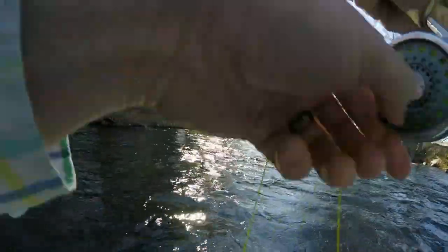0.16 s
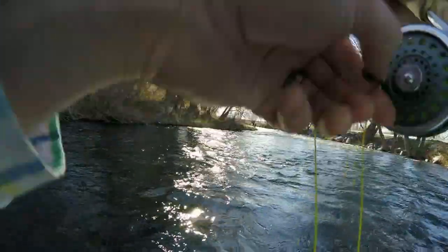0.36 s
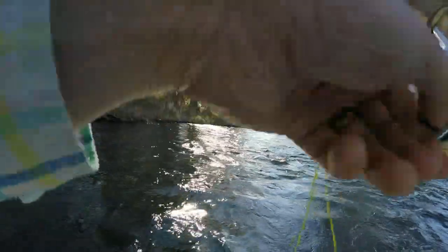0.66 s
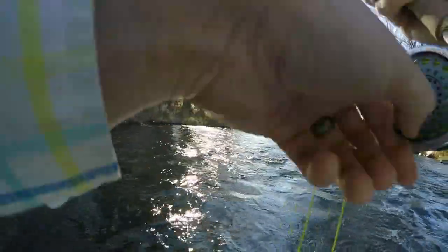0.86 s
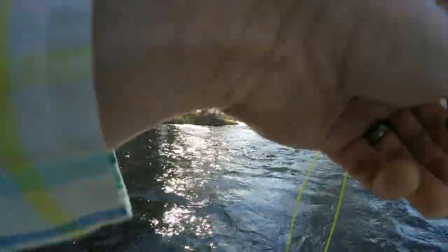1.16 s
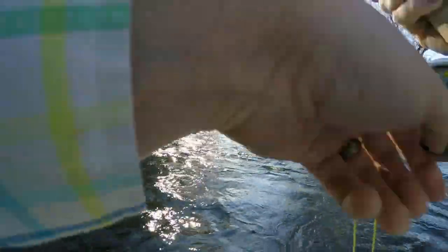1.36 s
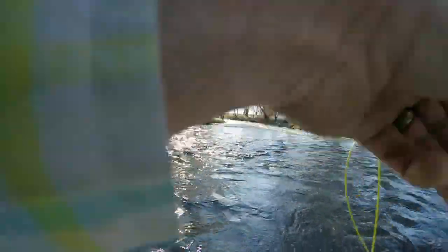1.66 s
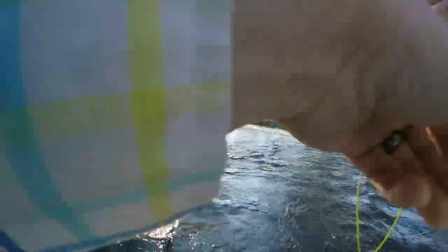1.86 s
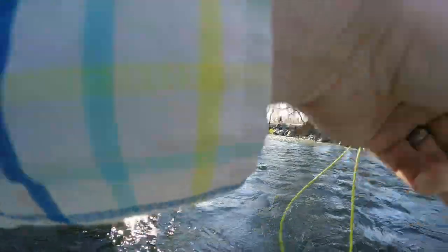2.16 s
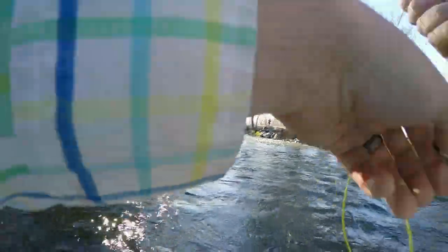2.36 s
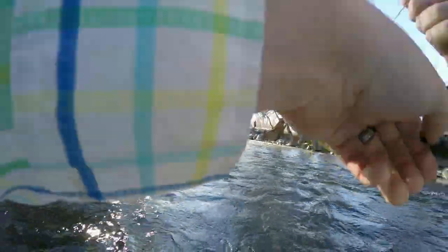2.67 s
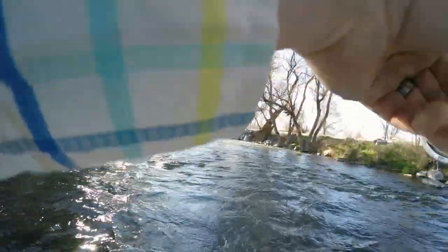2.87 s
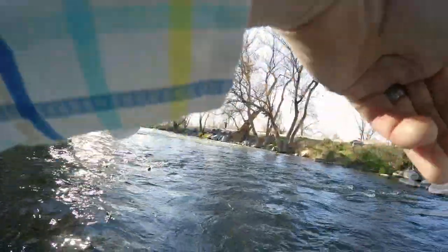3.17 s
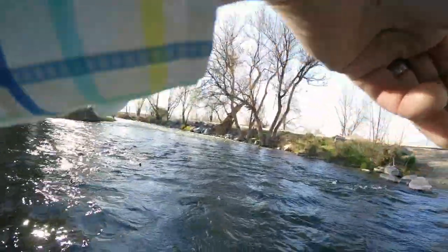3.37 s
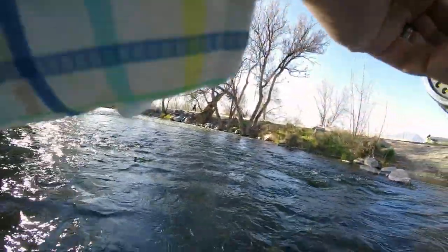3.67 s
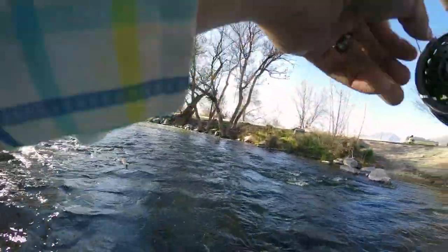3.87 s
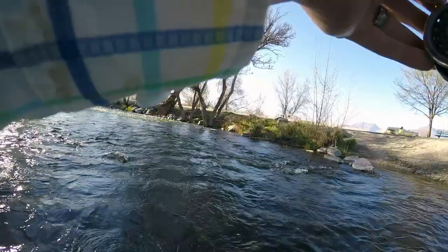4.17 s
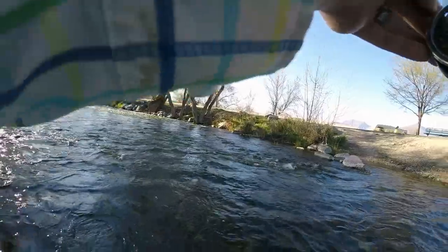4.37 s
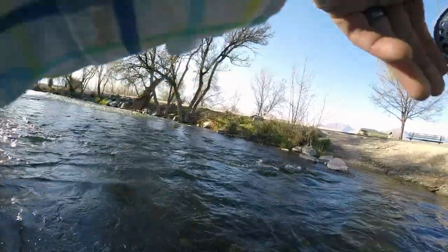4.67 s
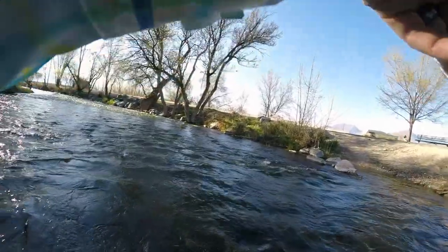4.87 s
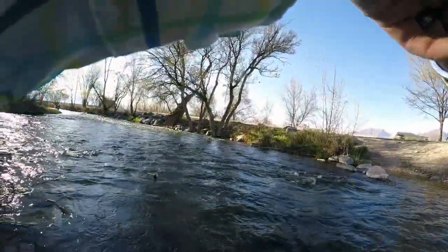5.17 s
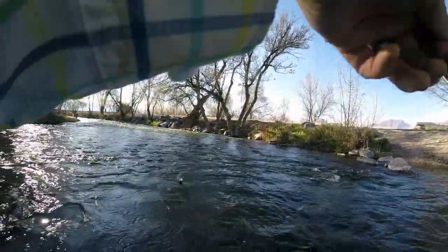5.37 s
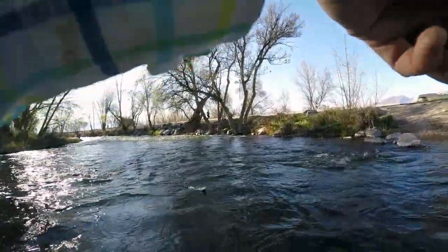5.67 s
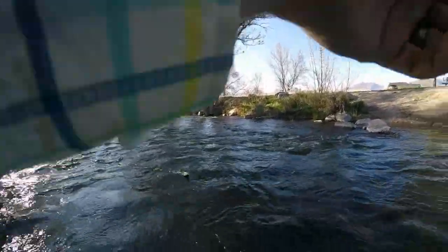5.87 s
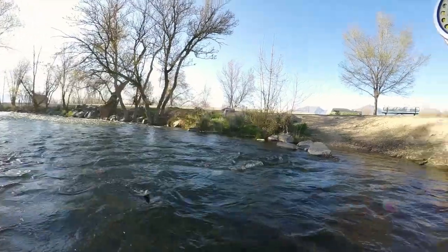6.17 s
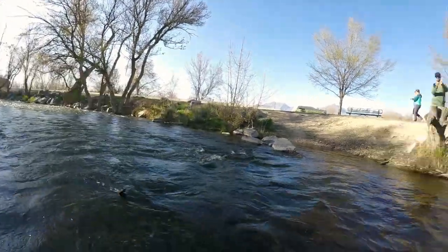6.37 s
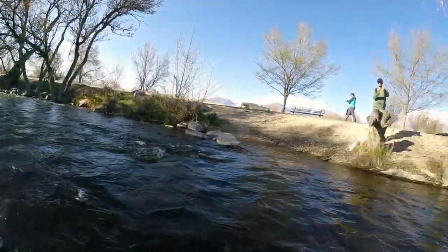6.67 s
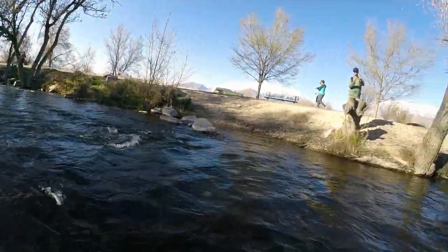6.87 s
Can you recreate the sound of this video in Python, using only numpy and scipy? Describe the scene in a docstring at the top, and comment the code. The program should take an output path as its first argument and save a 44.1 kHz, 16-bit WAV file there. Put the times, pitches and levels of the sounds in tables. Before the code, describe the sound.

Close by, a fishing reel's ratchet buzzes in fast metallic clicks, slows, then rattles out again over a gurgling river before wind gusts swamp the microphone.

```python
"""A fly reel is cranked close to a small camera, with a river gurgling and wind on the microphone throughout.
First come twelve quick turns: a spring pawl snaps over a 32-tooth gear and each snap rings the spool's modes.
Then come slow single clicks, a thin whistle, and a run of clicks as line is pulled back out; a gust ends it.
Snaps, bubbles and handle knocks are damped sines, and the whistle is a wavering sine.
The river wash, the wind and the rubbing of line and gear are shaped noise."""
import sys
import numpy as np
from scipy import signal
from scipy.io import wavfile
from scipy.ndimage import uniform_filter1d, map_coordinates

SR = 44100
rng = np.random.default_rng(int(sys.argv[2]) if len(sys.argv) > 2 else 0)


def transcribe(signal):
    """Save signal, clipped to [-1, 1], as a 16-bit WAV file at the path in sys.argv[1]."""
    frames = np.atleast_2d(signal).T
    limited = np.clip(frames, -1, 1)
    pcm = np.round(limited * 32767).astype(np.int16)
    wavfile.write(sys.argv[1], SR, pcm)


N = 309132  # length in samples, about 7 s

# quick turns of the handle, one row each: (start [s], quarter [s], half [s], three quarters [s],
# relative click level at the half turn [dB])
TURNS = [(.0041, 0.066, .1272, .1886, -20), (0.2377, 0.2977, .3634, .4212, -20),
         (0.4691, 0.5235, .5822, .6482, -19.5), (.6899, 0.742, .8139, .8759, -20),
         (0.9283, 0.9911, 1.064, 1.1248, -20), (1.1754, 1.2355, 1.3065, 1.374, -21),
         (1.4215, 1.477, 1.5451, 1.6081, -20.5), (1.655, 1.722, 1.7871, 1.8484, -20.5),
         (1.8988, 1.9548, 2.0287, 2.0971, -21.5), (2.1516, 2.2258, 2.3, 2.3728, -22),
         (2.4328, 2.5096, 2.5961, 2.6825, -22.5), (2.7466, 2.8397, 2.9218, 3.0042, -22)]
# the wrist labours at the same places: (share of each quarter's time spent on its first half [0 to 1])
FIRST_HALF = [.472, .536, .501, .517]
# single snaps, one tooth each: (time [s], relative level [dB])
SINGLE_SNAPS = [(3.0786, -22), (3.0878, -23), (3.0984, -24), (3.1124, -20), (3.1354, -19), (3.3808, -21),
                (3.4404, -21), (3.467, -19.5), (3.4886, -18.5), (3.517, -19), (3.5637, -19.5),
                (3.59, -20.5), (3.612, -21.5), (3.6694, -23), (3.7009, -20.5), (3.7334, -21), (3.7562, -28),
                (4.3406, -14), (5.2254, -19), (5.241, -17), (5.2565, -18), (5.2731, -18), (5.2937, -15.5),
                (5.3158, -16), (5.3356, -15), (5.3522, -15), (5.3652, -12.5), (5.3766, -16),
                (5.3871, -15.5), (5.3979, -16.5), (5.4089, -16.5), (5.4205, -17.5), (5.4335, -19.5),
                (5.4474, -24), (5.4625, -19.5), (5.4794, -17.5), (5.498, -19), (5.5183, -19), (5.547, -18),
                (5.5862, -18), (5.62, -19.5), (5.649, -19.5), (5.6787, -21.5), (5.707, -20.5),
                (5.7271, -21.5), (5.742, -20), (5.7542, -23), (5.7644, -23.5), (5.7751, -20), (5.7866, -20),
                (5.802, -19)]
# the pawl slips faintly without passing a tooth: (time [s], relative level [dB])
SLIPS = [(3.6935, -38), (3.708, -38), (3.797, -40), (4.328, -37), (4.572, -40), (5.536, -37), (5.693, -33)]
# ways the spool rings: (pitch [Hz], time to fall 60 dB before extra damping [s], pitch sway [%],
# tooth of highest pitch [tooth number], then eight relative levels towards the microphone,
# one for each eighth of the turn [dB])
SPOOL_MODES = [(1730, 0.0036, 1.2, 6.7, -14, -11.5, -14, -9.5, -8, -3, -8.5, -13),
               (2403, 0.0061, 0.33, 20, -7.5, -19, -41, -10, -4, -13, -7, -4.5),
               (2727, 0.0081, 3.4, 14.6, 4.5, 5, 0, 2, 0.5, 0, 2.5, 4),
               (3206, 0.0091, 1.1, 33, -2, -16, -3, -6.5, -6, -6, 2, 4),
               (3790, 0.0075, 4, 25.5, 4, -6, -7, -1, 2, -2, 3, 2.5),
               (4200, 0.011, 2, 28.6, 9, 1.5, -3, 1.5, 7, 9.5, 8, 0),
               (4630, 0.0038, 1, 2.8, 12, -3, -7.5, -15, -11, 1, -0.5, -3),
               (5460, 0.0041, 1.6, 39, 7, -3, -10, -2.5, 0.5, -3, -1, 2),
               (6325, 0.0045, 3.3, 12.8, 0, -0.5, -0.5, -3, 3, 3.5, 3, -1),
               (7330, 0.0072, 3, 11.8, 1, -2.5, -3, -3, -3, -4, 1, -3.5),
               (8140, 0.0051, 1.1, 15.6, -1.5, -7.5, -0.5, 2, -5, 2, 3.5, 8.5),
               (8840, 0.0055, 1.4, 18, 2.5, 3, 2.5, -0.5, -2.5, 3.5, 1.5, -1),
               (9690, 0.0051, 0.41, 10.5, 3, -18, -11, -3.5, -1.5, -2, -9, -3.5),
               (10690, 0.0063, 2.2, 3.3, -8, 4, -29, -6, -6, -2.5, 0, 0),
               (11200, 0.041, 0.3, 4, -14, -16, -12, -17, -13, -8, -8, -10),
               (11295, 0.012, 0.33, 3.9, 0, -2, -3, -1, -3.5, 6, 2.5, 0),
               (11870, 0.0021, 0.91, 43, 3.5, -5, -5, -1, -1, 3, 6, -6),
               (13230, 0.0051, 2, 13, -3, 1, -17, -15, -2.5, -12, 0, 0),
               (13700, 0.0042, 0.9, 21, -9, -7, -8, -7, -7, -5, -4, -8),
               (15000, 0.0048, 1, 16, -9, -8, -13, -16, -11, -13, -11, -8)]
# the handle knocks on its pin: (time [s], peak before echoes [dB])
KNOCKS = [(.1915, -15.5), (0.4168, -16.5), (.640, -16), (.8667, -17.5), (1.071, -17), (1.369, -20),
          (1.571, -17.5)]
# river colour: (frequency [Hz], relative level [dB per Hz])
RIVER_COLOUR = [(130, -48), (220, -14.5), (364, -1.5), (645, -1.5), (941, -1.5), (1170, -7.5), (1860, -10),
                (2070, -13), (3130, -13), (3880, -17), (4560, -19.5), (9180, -31), (11400, -33.5),
                (15200, -39), (16000, -61)]
# river flow: (time [s], relative level [dB], extra treble fizz in the wash [dB])
FLOW = [(0.0, -39, 9), (0.31, -40, 3.5), (1.67, -39.5, 3.5), (1.82, -39.5, 3), (3.18, -41, 2),
        (3.47, -37, -3), (3.94, -40, 3), (4.12, -38, 2.5), (5.39, -40, -1), (5.61, -31, -8.5),
        (5.82, -32, -3), (6.02, -36, 0.5), (6.25, -37, 1.5), (6.56, -33, 1), (6.66, -33.5, -1.5),
        (6.97, -50.5, 16)]
# single bubbles: (time [s], peak level [dB], starting pitch [Hz], time to fall 60 dB, at least 0.005 [s])
BUBBLES = [(0.71, -28.5, 877, 0.06), (0.816, -34, 385, 0.051), (1.496, -27, 497, 0.091),
           (1.827, -23, 426, 0.019), (2.251, -25, 740, 0.019), (2.48, -29.5, 725, 0.051),
           (3.205, -26, 1720, 0.009), (3.349, -31, 1410, 0.025), (3.431, -27, 2090, 0.016),
           (3.78, -24, 675, 0.016), (3.842, -35, 2040, 0.017), (4.01, -28, 405, 0.07),
           (4.03, -26, 335, 0.06), (4.07, -23, 338, 0.022), (4.307, -32, 2230, 0.023),
           (4.327, -27.5, 1000, 0.041), (4.348, -24.5, 540, 0.066), (4.392, -25, 513, 0.044),
           (4.56, -28, 380, 0.11), (4.64, -24.5, 2550, 0.0081), (4.787, -36, 1260, 0.04),
           (4.849, -28, 890, 0.036), (4.864, -27, 1780, 0.0065), (4.99, -16.5, 212, 0.1),
           (5.027, -31, 2410, 0.012), (5.179, -36, 1850, 0.02), (5.348, -24, 164, 0.061),
           (5.445, -19.5, 1327, 0.039), (5.485, -23, 332, 0.037), (5.511, -24, 684, 0.047),
           (5.594, -22, 804, 0.019), (5.652, -13, 730, 0.021), (5.687, -20, 600, 0.021),
           (5.812, -21.5, 627, 0.054), (5.853, -23.5, 1820, 0.025), (5.887, -27, 1980, 0.009),
           (5.946, -25, 900, 0.013), (5.997, -23, 1730, 0.0066), (6.093, -28, 3320, 0.012),
           (6.421, -23.5, 1880, 0.0091), (6.513, -20, 1900, 0.014), (6.488, -26, 1150, 0.02),
           (6.512, -24, 1210, 0.033), (6.552, -26, 1370, 0.025), (6.584, -26, 1110, 0.02),
           (6.597, -19, 3010, 0.0038), (6.763, -27, 3380, 0.0069), (6.809, -25, 557, 0.076)]
# breeze on the microphone, before random lumps: (time [s], rumble [dB], flutter [dB], roar [dB])
BREEZE = [(0, -32.5, -53, -48.5), (.75, -37, -48.5, -46), (1.2, -32, -60, -47), (1.5, -35.5, -51, -44),
          (2.3, -29.5, -56, -46.5), (3.0, -28, -48, -45.5), (3.3, -33.5, -50, -45.5),
          (3.9, -24.5, -41, -40.5), (4.3, -19, -37.5, -42.5), (4.5, -25, -37.5, -41),
          (5.0, -23, -33.5, -38.5), (5.4, -27, -49, -38.5), (6.03, -26, -46, -42.5), (6.25, -16, -19, -39),
          (6.56, -12, -19.5, -31.5), (6.8, -14, -18.5, -30.5), (6.92, -25, -14.5, -25.5),
          (7.0, -5.5, -11.5, -19.5)]
# single buffets of wind: (time [s], peak rumble [dB], peak flutter [dB])
BUFFETS = [(.06, -30, -38.5), (.53, -35, -42), (1.2, -26, -53), (1.335, -25, -45), (1.59, -27.5, -43),
           (2.51, -24, -39), (3.17, -23, -38), (3.37, -43, -38), (3.74, -37, -36), (4.17, -20, -25.5),
           (4.83, -26, -26), (4.99, -34, -25.5), (5.2, -22, -35), (5.35, -36, -31.5), (5.49, -15, -46),
           (5.63, -19, -49), (5.72, -24, -35), (5.89, -26, -29.5), (5.96, -19.5, -43), (6.12, -21, -43),
           (6.21, -24, -21), (6.32, -15, -25), (6.66, -12, -17), (6.76, -11, -14), (6.85, -21, -14.5)]

TEETH, LAST_TURN_ENDS_S = 32, 3.0703
PULL_S = 5.0  # from here line is pulled out and the gear runs backwards
# treble tilt of the snaps (dB per octave): first turn, last turn, slow winding, line pulled out, slips
TILT_FIRST_DB, TILT_LAST_DB, TILT_SLOW_DB, TILT_PULL_DB, TILT_SLIP_DB = 2, 0.1, -0.6, 0.8, -3
PULL_DAMPING_DB_PER_S = 2500  # the taut line and a palm on the spool shorten the ring
RING_HZ, RING_FADE_DB, RING_FADE_S = 4190, -5, 2.7  # the ring near this pitch weakens as the turns slow down
KNOCK_HZ = 3210
# rubbing at 100 teeth a second: level (dB) and centre (Hz), winding in and pulling out
RUB_IN_DB, RUB_IN_HZ, RUB_OUT_DB, RUB_OUT_HZ = -51, 6300, -34, 3900
# the level always rises with speed, the centre only while winding in
RUB_DB_PER_DOUBLING, RUB_IN_OCTAVES_PER_DOUBLING, RUB_SMOOTH_S = 8, 0.33, 0.03
WHISTLE_S, WHISTLE_LENGTH_S, WHISTLE_EDGE_S = 4.66, 0.25, 0.045
WHISTLE_DB, WHISTLE_HZ, WHISTLE_ARCH_HZ = -55, 4920, 120
BUFFET_S, BUFFET_ROAR_DB, LUMPS_DB = 0.023, -18, 2  # half width; roar relative to flutter; random lumps
HISS_DB, EDGE_HZ = -67, 16300  # level of a faint steady hiss; highest pitch kept


def reel():
    """Each snap rings all spool modes; the turning spool aims and tunes them differently from tooth to tooth."""
    s, db, tilt, tooth = clicks()
    hz, t60, sway, top_tooth, *aim_db = np.transpose(SPOOL_MODES)
    t = np.arange(900) / SR
    out = np.zeros((4, N))  # four sets of echoes, taken in turn

    # neighbouring snaps, and the same tooth a turn later, sound alike
    own = drifting(TEETH, 3 * len(hz), span=2)[np.round(tooth).astype(int) % TEETH]
    lately = drifting(len(s), 3 * len(hz), span=4)
    mixed = 0.44 * own + 0.76 * lately + 0.29 * rng.standard_normal(own.shape)
    phase, spread, detune = np.split(mixed, 3, axis=1)

    # loudness of each mode in each snap
    middles = np.arange(2, TEETH, 4)  # middle tooth of each eighth
    aimed_db = np.array([np.interp(tooth, middles, row, period=TEETH) for row in np.transpose(aim_db)]).T
    level_db = db[:, None] - 13.5 + aimed_db + tilt[:, None] * np.log2(hz / 6000)
    fade_db = RING_FADE_DB * np.minimum(s / RING_FADE_S, 1)
    level_db += fade_db[:, None] * (abs(hz / RING_HZ - 1) < 0.06)
    chance_db = 2.37 * spread * np.clip(hz / 7000, 0.45, 1.1)  # the low modes are the steadiest
    power = gain_of(2 * level_db)
    # chance moves energy between modes, adding none
    shared = (power * gain_of(2 * chance_db)).sum(1) / power.sum(1)
    level_db = level_db + chance_db - 10 * np.log10(shared)[:, None]
    level_db = level_db + 0.93 * spread[:, :1]  # whole snaps vary a little too

    # pitch of each mode in each snap: high, short-lived modes wander most
    f = hz * (1 + sway / 100 * np.cos(2 * np.pi * (tooth[:, None] - top_tooth) / TEETH))
    f += detune * 0.017 * hz * (0.0066 / t60) * np.clip(hz / 8000, 0.2, 1) ** 0.86

    rise_s = 0.00018 + 1.15 / hz[:, None]  # low modes take longer to swing in
    shape = (1 - np.exp(-t / rise_s)) ** 2 * gain_of(-60 * t / t60[:, None])
    shape = shape / np.sqrt((shape ** 2).sum(1, keepdims=True) / 380)  # equal energy whatever the decay
    for k in range(len(s)):
        start_phase = (1.25 + hz / 7000) * phase[k]
        waves = np.sin(2 * np.pi * f[k][:, None] * t + start_phase[:, None])
        ring = gain_of(level_db[k]) @ (shape * waves)
        damping = gain_of(-PULL_DAMPING_DB_PER_S * t * (s[k] > PULL_S))
        add(out[k % len(out)], s[k] - 0.0003, damping * ring)
    add_knocks(out[0])
    return out.sum(0) + gain_of(-19.0) * sum(near_echoes(part) for part in out)


def clicks():
    """The snaps, then the slips on whichever tooth the pawl rests."""
    s, db, tilt, tooth = snaps()
    slip_s, slip_db = np.transpose(SLIPS)
    slip_tilt = np.full(len(slip_s), TILT_SLIP_DB)
    slip_tooth = tooth[np.searchsorted(s, slip_s) - 1]
    return np.r_[s, slip_s], np.r_[db, slip_db], np.r_[tilt, slip_tilt], np.r_[tooth, slip_tooth]


def snaps():
    """Moment, level, tilt and tooth of each snap: the gear's turning sets when the pawl drops off a tooth."""
    *marks, turn_db = np.transpose(TURNS)
    quarters = np.r_[np.ravel(marks, order="F"), LAST_TURN_ENDS_S]
    halves = quarters[:-1] + np.tile(FIRST_HALF, len(TURNS)) * np.diff(quarters)
    eighths = np.sort(np.r_[quarters, halves])
    tooth = np.arange(TEETH * len(TURNS) + 1)
    # a smooth curve through the marks, four teeth apart, gives the time of every tooth
    s = map_coordinates(eighths, [tooth / 4], order=3, mode="nearest")
    db = np.interp(s, marks[2], turn_db)
    tilt = np.linspace(TILT_FIRST_DB, TILT_LAST_DB, len(s))

    single_s, single_db = np.transpose(SINGLE_SNAPS)
    pulled = single_s > PULL_S
    single_tilt = np.where(pulled, TILT_PULL_DB, TILT_SLOW_DB)
    single_tooth = np.cumsum(np.where(pulled, -1, 1))
    return np.r_[s, single_s], np.r_[db, single_db], np.r_[tilt, single_tilt], np.r_[tooth, single_tooth]


def add_knocks(mix):
    """The handle knocks on its pin: a short damped tone each time."""
    for s, peak_db in KNOCKS:
        add(mix, s, gain_of(peak_db) * blip(KNOCK_HZ, 0.0071, 0, 0.00034))


def near_echoes(x):
    """Hands, sleeve and rod scatter each click into a short tail."""
    t = np.arange(1500) / SR
    taps = rng.standard_normal(len(t)) * gain_of(-60 * t / 0.025) * (t > 0.0012)
    return signal.oaconvolve(x, taps / np.linalg.norm(taps))[:N]


def rub():
    """Line and gear rub: clumpy, scratchy noise, louder with speed and, while winding in, brighter too."""
    s, at = snaps()[0], np.arange(N) / SR
    gap_rate = 1 / np.diff(s)
    rate = np.r_[gap_rate[0], gap_rate, 1][np.searchsorted(s, at)]  # teeth a second
    doublings = np.log2(uniform_filter1d(rate, round(RUB_SMOOTH_S * SR)) / 100)
    in_hz = RUB_IN_HZ * 2 ** (RUB_IN_OCTAVES_PER_DOUBLING * doublings)
    centre_hz = np.where(at > PULL_S, RUB_OUT_HZ, in_hz)

    def field(hz, t, chance):
        clumps = uniform_filter1d(uniform_filter1d(chance, 30, 0), 3, 1)
        octaves = np.log2(hz / np.interp(t, at, centre_hz))
        return 5.8 * clumps / clumps.std() - 18.0 * octaves ** 2 - 10 * np.log10(hz)

    level_db = np.where(at > PULL_S, RUB_OUT_DB, RUB_IN_DB) + RUB_DB_PER_DOUBLING * doublings
    return gain_of(level_db) * evened(noise(field, size=128))


def whistle():
    """A thin, slightly unsteady sine tone that arches a little in pitch."""
    t, out = np.arange(0, WHISTLE_LENGTH_S, 1 / SR), np.zeros(N)
    waver = 1 + 0.031 * drifting(len(t), 1, span=90)[:, 0]
    hz = WHISTLE_HZ + WHISTLE_ARCH_HZ * np.sin(np.pi * t / WHISTLE_LENGTH_S)
    edges = np.minimum(np.minimum(t, WHISTLE_LENGTH_S - t) / WHISTLE_EDGE_S, 1) ** 2
    tone = np.sin(2 * np.pi * np.cumsum(hz * waver) / SR)
    add(out, WHISTLE_S, gain_of(WHISTLE_DB) * edges * tone)
    return out


def river():
    """Moving water: a patchy wash and a crowd of small bubbles follow the flow; clear bubbles stand out."""
    at, flow_db, _ = np.transpose(FLOW)
    flow = gain_of(np.interp(np.arange(N) / SR, at, flow_db))
    out = flow * (gain_of(-4.5) * river_wash() + gain_of(-4) * evened(bubble_crowd()))
    for s, db, hz, t60 in BUBBLES:
        add(out, s, gain_of(db) * blip(hz, max(t60, 0.005), 0.082, 0.019 * t60))
    return out


def river_colour(hz):
    """River level in dB at any frequency, read along an octave-like scale."""
    f, colour_db = np.transpose(RIVER_COLOUR)
    return np.interp(np.log(hz), np.log(f), colour_db)


def river_wash():
    """Many tiny water sounds blur into noise with random patches and treble splashes."""
    at, _, fizz_db = np.transpose(FLOW)

    def field(hz, t, chance):
        patches = uniform_filter1d(uniform_filter1d(chance, 8, 0), 8, 1)
        flicker = uniform_filter1d(chance[::-1], 70, 0)  # spray lands across wide treble bands at once
        splash = np.clip(np.log2(hz / 1500), 0, 1) * 3.3 * flicker / flicker.std()
        fizz = np.clip(np.log2(hz / 1300), 0, 1) * np.interp(t, at, fizz_db)
        return river_colour(hz) + 2.06 * patches / patches.std() + fizz + splash

    wash = noise(field, size=512)
    middle = signal.butter(4, [450, 1300], "bandpass", fs=SR, output="sos")
    return wash / signal.sosfilt(middle, wash).std()  # the middle band sets the level


def bubble_crowd():
    """Small bubbles of 30 pitches burst at random, about nine a second at each pitch."""
    crowd = np.zeros(N)
    for hz in np.geomspace(300, 9000, 30):
        starts = rng.random(N) < 9.0 / SR
        size = gain_of(2.5 * np.minimum(rng.exponential(1, N), 4)) * starts
        db = river_colour(hz) + 4.4 * np.log2(hz / 700)
        crowd += gain_of(db) * signal.oaconvolve(size, blip(hz, 26.6 / hz, 0.45, 4.5 / hz))[:N]
    return crowd


def wind():
    """Low turbulence in three overlapping bands: a lumpy breeze with single buffets on top."""
    at, rumble_db, flutter_db, roar_db = np.transpose(BREEZE)
    s, hit_rumble_db, hit_flutter_db = np.transpose(BUFFETS)
    t, out = np.arange(0, N / SR, 0.002), 0
    bumps = np.exp(-((t[:, None] - s) / BUFFET_S) ** 2)
    # (low edge [Hz], high edge [Hz], steepness above it, breeze level [dB], buffet peaks [dB])
    bands = ((17.2, 60.5, 17.7, rumble_db, hit_rumble_db),
             (119.0, 121.0, 14.3, flutter_db, hit_flutter_db),
             (254.0, 405.0, 11.8, roar_db, hit_flutter_db + BUFFET_ROAR_DB))
    for low_hz, high_hz, steep, level_db, peak_db in bands:
        def field(hz, t, chance):
            above_db = -steep * np.log10(1 + (hz / high_hz) ** 4)
            return above_db - 10 * np.log10(1 + (low_hz / hz) ** 4)

        band = noise(field, size=2048)
        band /= np.sqrt(uniform_filter1d(band ** 2, size=5000) + 1e-20)  # breeze and buffets set the level
        lumps_db = LUMPS_DB * drifting(len(t), 1, span=30)[:, 0]
        breeze = gain_of(np.interp(t, at, level_db) + lumps_db)
        strength = np.sqrt(breeze ** 2 + bumps @ gain_of(2 * peak_db))
        out = out + np.interp(np.arange(N) / SR, t, strength) * band
    return out


def blip(hz, t60, glide, rise_s):
    """A damped sine; with glide above 0 it slides upward, as a bubble does near the surface."""
    t = np.arange(0, t60, 1 / SR)
    shape = (1 - np.exp(-t / rise_s)) * gain_of(-60 * t / t60)
    return shape / shape.max() * np.sin(2 * np.pi * hz * (t + glide * t ** 2 / (2 * t60)))


def noise(db, size):
    """Noise whose short-time spectrum follows db(frequency column, time row, random field)."""
    hop = size // 4
    hz = np.fft.rfftfreq(size, 1 / SR)[:, None] + 1
    t = np.arange(N // hop + 5) * hop / SR
    a, b, chance = rng.standard_normal((len(t), len(hz), 3)).T
    spectrum = (a + 1j * b) * gain_of(db(hz, t, chance))
    return signal.istft(spectrum, nperseg=size, noverlap=size - hop)[1][:N]


def drifting(rows, columns, span):
    """Chance of spread 1 that changes smoothly, and cyclically, down the rows."""
    x = uniform_filter1d(rng.standard_normal((rows, columns)), span, 0, mode="wrap")
    return x / x.std()


def gain_of(db):
    """Decibels to amplitude."""
    return 10 ** (np.asarray(db) / 20)


def evened(x):
    """Scales the last axis to an rms (average strength) of 1."""
    return x / np.sqrt(np.mean(x ** 2, axis=-1, keepdims=True) + 1e-20)


def add(mix, s, sound):
    """Mixes a sound in at s seconds."""
    part = mix[max(round(s * SR), 0):][:len(sound)]
    part += sound[:len(part)]


def scene():
    """Reel, rubbing, whistle, river and wind add up at one microphone."""
    return (reel() + rub() + whistle() + river() + wind())[None]


def record(dry):
    """A faint steady hiss is added, the loudest gusts round off softly, and the highest treble is cut."""
    hiss = signal.oaconvolve(rng.standard_normal(N), signal.firwin(127, 15200, fs=SR), "same")
    soft = np.tanh(dry + gain_of(HISS_DB) * hiss)
    treble_cut = signal.firwin(255, EDGE_HZ, window=("kaiser", 9), fs=SR)
    return signal.oaconvolve(soft, treble_cut[None], "same")


dry = scene()
out = record(dry)
transcribe(out)
```